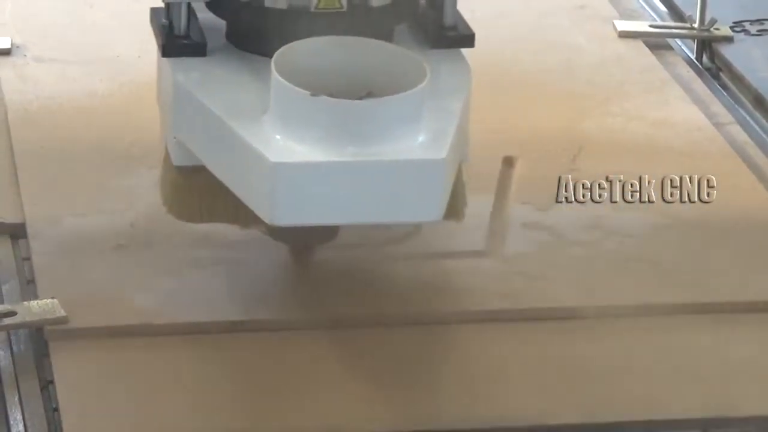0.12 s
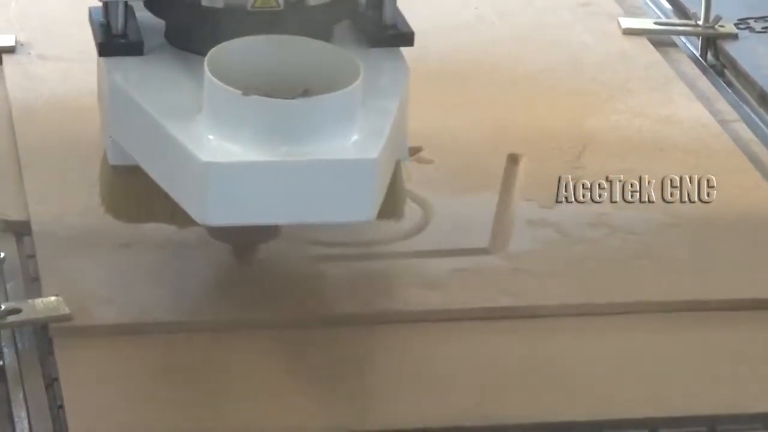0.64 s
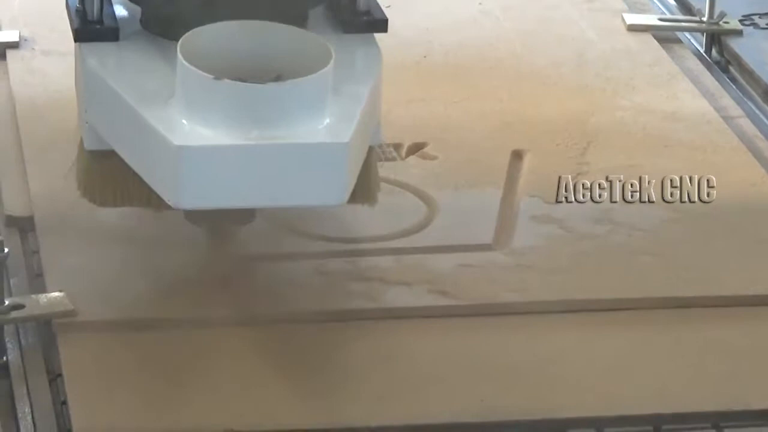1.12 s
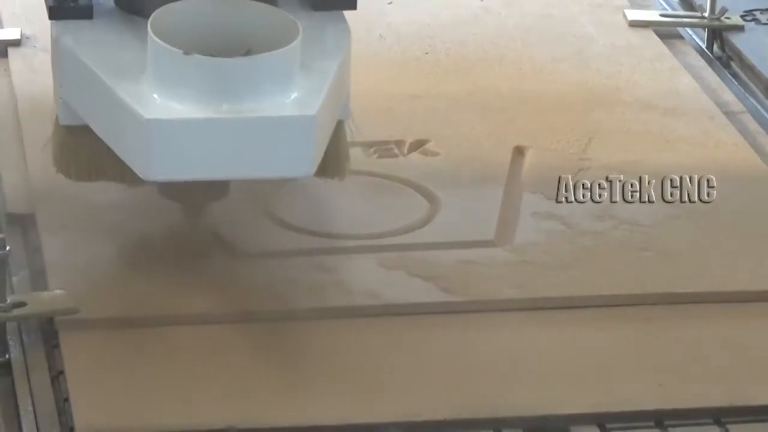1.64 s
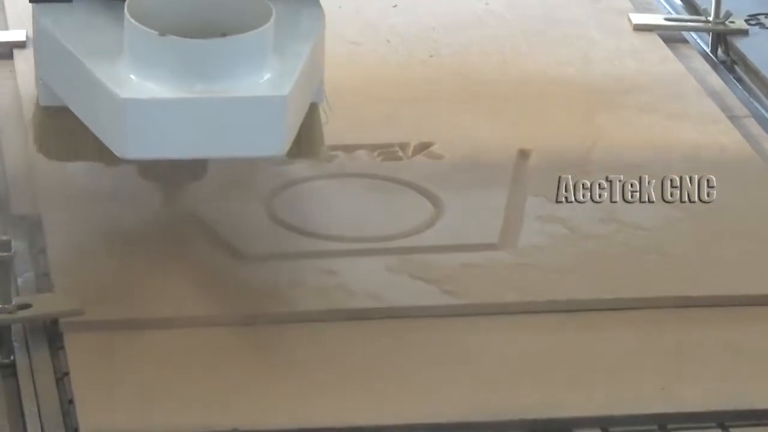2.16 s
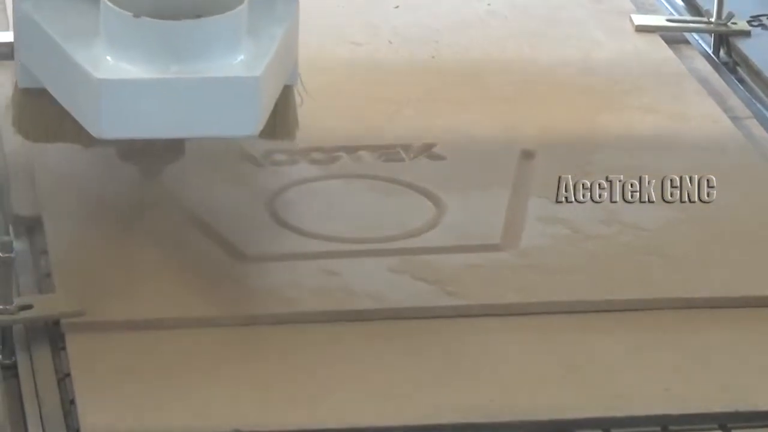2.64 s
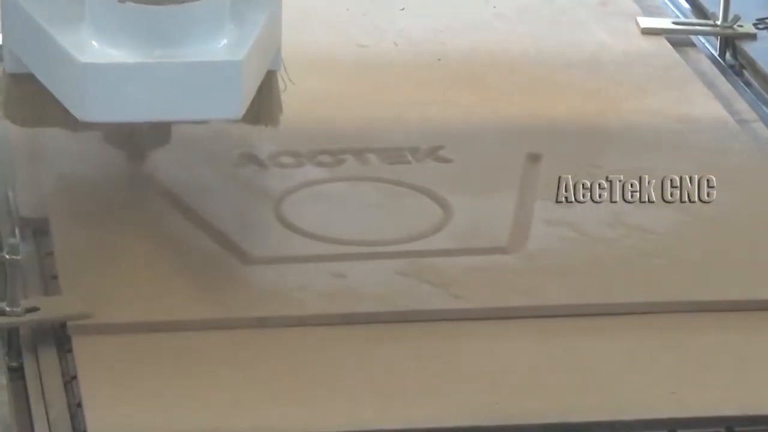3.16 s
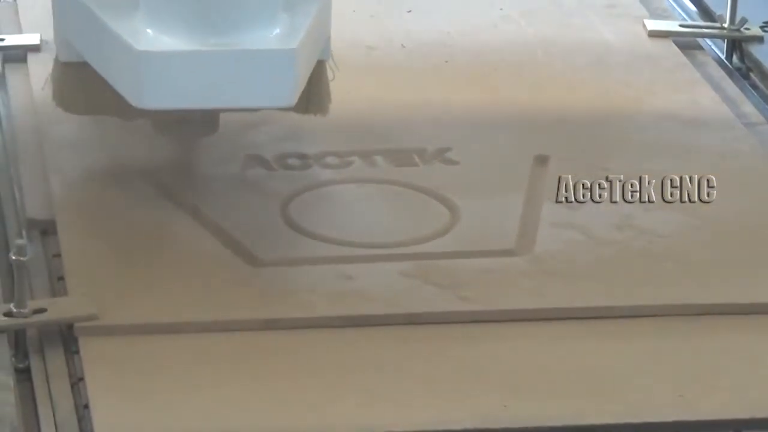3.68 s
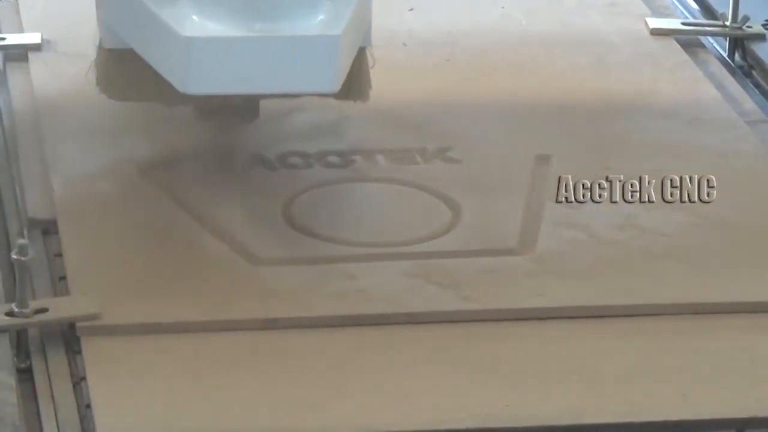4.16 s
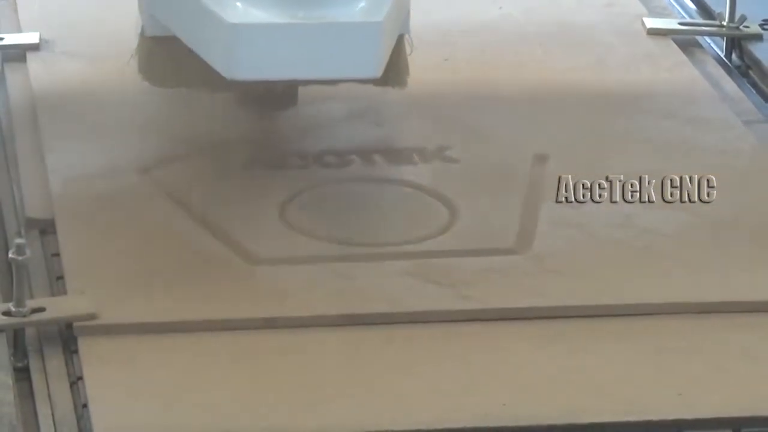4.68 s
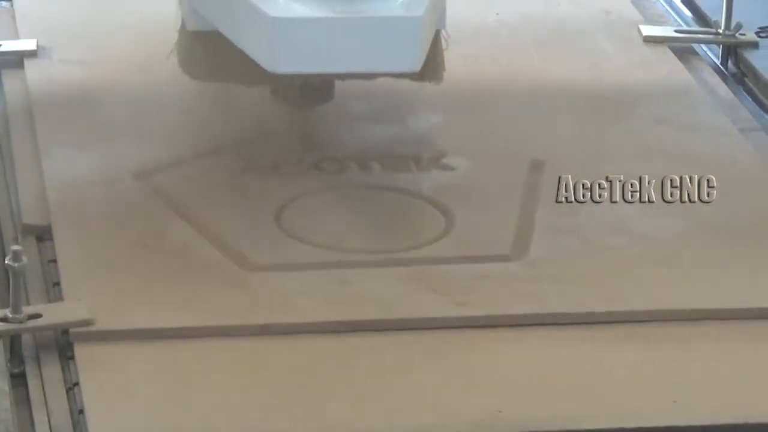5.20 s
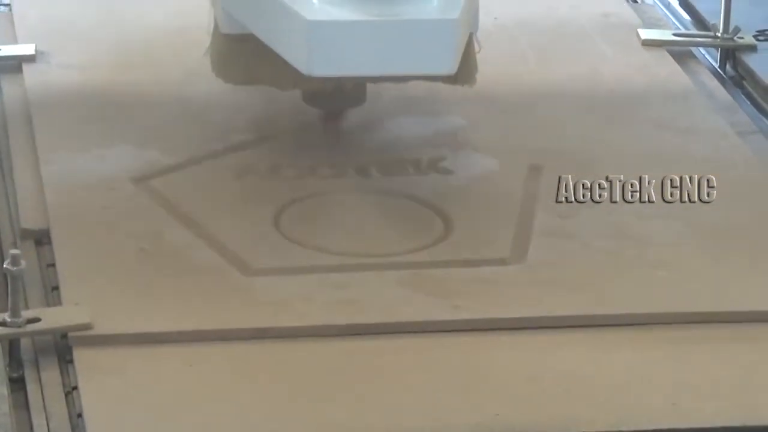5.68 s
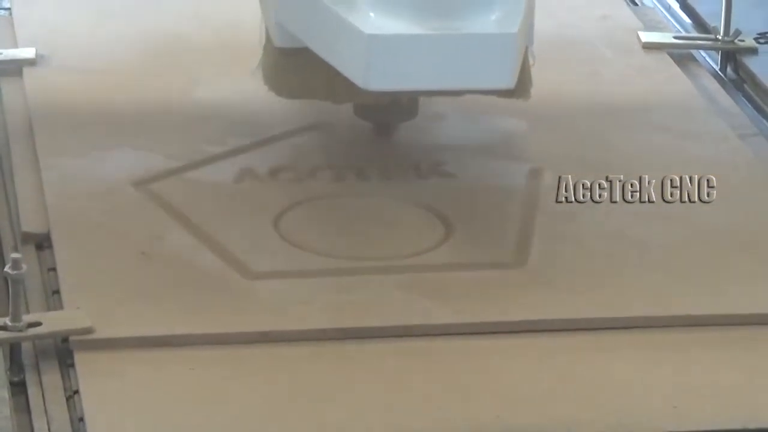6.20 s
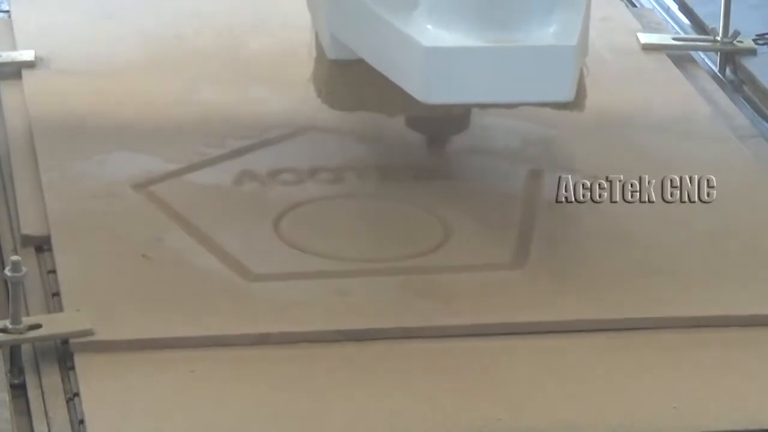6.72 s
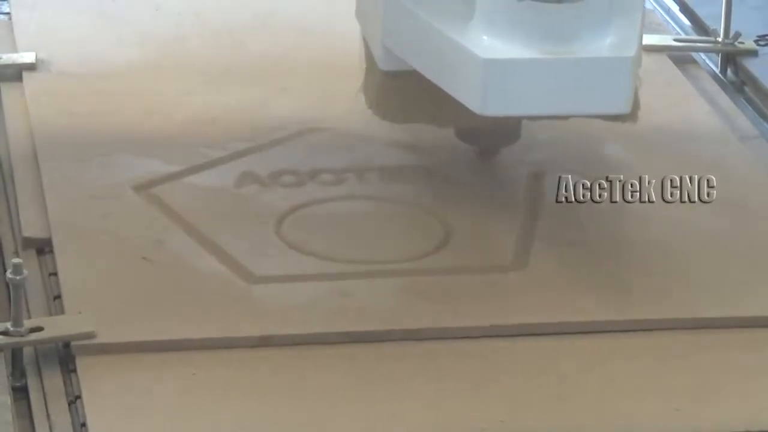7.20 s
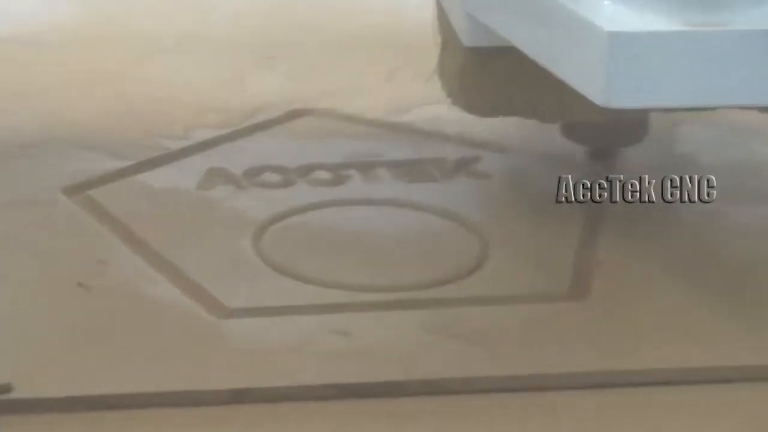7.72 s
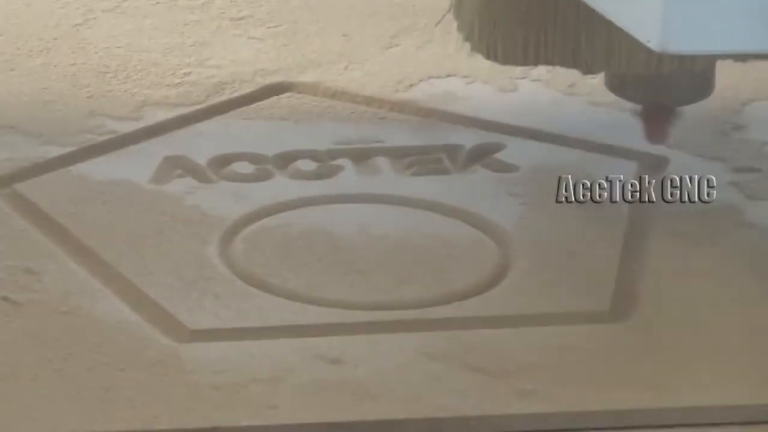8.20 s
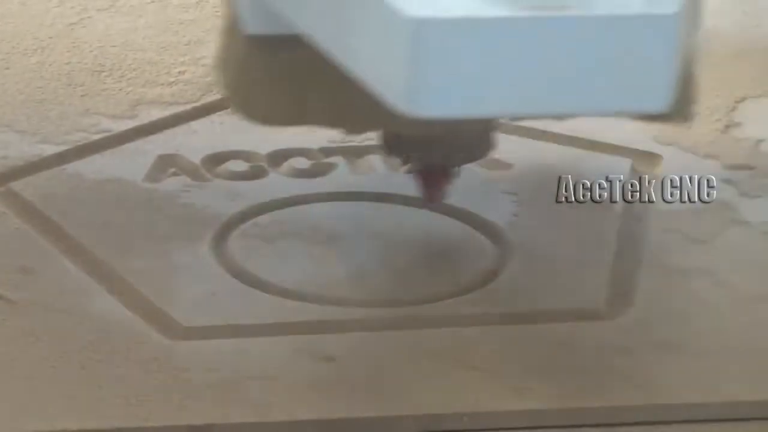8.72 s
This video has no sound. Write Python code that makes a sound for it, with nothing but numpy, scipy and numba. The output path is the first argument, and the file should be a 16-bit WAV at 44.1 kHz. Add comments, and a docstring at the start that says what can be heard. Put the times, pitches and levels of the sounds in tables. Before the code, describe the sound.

A fast spindle sings one unchanging mid-range pitch, with harmonics swelling and fading as the head moves. Over it lies sharp, sizzling chip noise with sliding bright peaks and a short early burst of snaps. Behind are a low fan drone, hum and airy wash. At about eight seconds cutting stops suddenly, leaving air, hum and a fainter whine, heard fairly close in a workshop with slight stereo width.

```python
"""A steady whine stands in front, the spindle of a router at 299.47 turns a second, strongest at twice that.
With it comes the hiss of a bit tearing chips from a wooden board, until it lifts out at 7.9 s.
The whine is a sum of sines; the chips are noise in puffs and ticks timed by the turns, through resonances.
Farther off, coloured noise and three sines make the workshop's fan rumble, drone, rushing air and hum.
Left and right differ by noise patches that flicker in level, strongest near 9 kHz."""
import sys
import numpy as np
from scipy import signal
from scipy.fft import rfft, irfft, next_fast_len
from scipy.io import wavfile
from numba import njit

SR = 44100
rng = np.random.default_rng(int(sys.argv[2]) if len(sys.argv) > 2 else 0)


def materialize(psi):
    """Save the field psi as 16-bit PCM at rate SR to the path in sys.argv[1].

    A 1-D psi becomes a single channel; in a 2-D psi each row is a channel.
    """
    bounded = np.clip(np.atleast_2d(psi).T, -1, 1)
    quanta = np.round(bounded * 32767).astype(np.int16)
    wavfile.write(sys.argv[1], SR, quanta)


N = 390285   # length [samples]

TURNS_PER_S = 299.47
LIFT_S = 7.9   # the bit leaves the wood
SURGE_RISE_S = 0.021   # onset of rumble surges and of splintering


def from_db(db):
    """Decibels to gain."""
    return 10 ** (np.asarray(db) / 20)


def rms_one(x):
    """Scale to rms 1."""
    return x / np.sqrt(np.mean(x ** 2) + 1e-20)


def seconds():
    """Time of every sample."""
    return np.arange(N) / SR


def since_lift():
    """Seconds since the bit left the wood, zero before."""
    return np.maximum(seconds() - LIFT_S, 0)


def in_time(rows):
    """Columns of a timed curve, one value a sample."""
    s, *columns = np.transpose(rows)
    return [np.interp(seconds(), s, column) for column in columns]


def swells(rows):
    """Sum of smooth bumps from (centre [s], length [s], height) rows."""
    hold = 1.29   # above 1 the top of a bump is flat
    total = 0
    for centre, length, height in rows:
        phase = np.pi * np.clip((seconds() - centre) / length, -.5, .5)
        total = total + height * np.minimum(hold * np.cos(phase) ** 2, 1)
    return total


def of_order(rows, k):
    """The bumps whose frequency belongs to order k of the spindle speed."""
    return swells([(s, length, db) for s, length, hz, db in rows if round(hz / TURNS_PER_S) == k])


def colour(x, points):
    """Filter by a (Hz, dB) outline; next to nothing passes outside it."""
    hz, db = np.transpose(points)
    size = next_fast_len(N)
    grid = np.maximum(np.arange(size // 2 + 1) * SR / size, 1)
    gain = from_db(np.interp(np.log(grid), np.log(hz), db, left=-80, right=-80))
    return irfft(rfft(x, size) * gain, size)[..., :N]


def drift(rate):
    """Slow chance: noise at every 40th sample through a double one-pole low-pass at rate [Hz]; spread 1."""
    r = np.exp(-80 * np.pi * rate / SR)
    start = rng.standard_normal(N // 40 + 2002)
    slow = signal.lfilter([1], [1, -2 * r, r * r], start)[2000:]   # settled part only
    return np.interp(np.arange(N) / 40, np.arange(len(slow)), rms_one(slow - slow.mean()))


@njit
def resonance(x, hz, width_hz, sr):
    """Two-pole resonance with a moving centre, gain 1 on top."""
    out, r = np.zeros(len(x)), np.exp(-np.pi * width_hz / sr)
    for i in range(2, len(x)):
        driven = (1 - r * r) / 2 * (x[i] - x[i - 2])
        out[i] = driven + 2 * r * np.cos(2 * np.pi * hz[i] / sr) * out[i - 1] - r * r * out[i - 2]
    return out


def noise(points, patchy_db, rate):
    """Coloured noise whose level flickers a little; rms 1."""
    return rms_one(colour(rng.standard_normal(N), points) * from_db(patchy_db * drift(rate)))


def tone(cycles, waver_db, rate):
    """A sine, of rms 1 but for its waver in level; its phase wavers too."""
    phase = cycles + rng.random() + 0.0054 * drift(rate)
    return np.sqrt(2) * from_db(waver_db * drift(rate)) * np.sin(2 * np.pi * phase)


def leaning(x, left_db):
    """Two channels, the left louder than the right by left_db."""
    return np.array([x * from_db(left_db / 2), x * from_db(-left_db / 2)])


def echoes(x, rows):
    """Short reflections whose wandering lags comb the sound; rows of (lag [ms], wander [ms], level [dB])."""
    now = np.arange(N)
    out = x
    for lag, wander, db in rows:
        delay = (lag + wander * drift(0.39)) * SR / 1000
        out = out + from_db(db) * np.interp(now - delay, now, x)
    return out


def spread(mid, wider_db):
    """Left and right differ by noise patches that flicker in level: the sound smeared by 2 ms of noise."""
    # outline of the side before wider_db, strongest near 9 kHz: (frequency [Hz], level [dB])
    side_outline = [(200, -67), (400, -37), (900, -44), (1500, -44), (3000, -50.5), (6000, -23.5),
                    (8800, -17.5), (11000, -27), (15000, -54)]
    size = round(.002 * SR)
    smears = rng.standard_normal((8, size)) * from_db(-30 * np.arange(size) / size)
    patches = sum(drift(13.0) * np.convolve(mid, smear)[:N] for smear in smears)
    patches = patches / np.sqrt(np.sum(smears ** 2))
    side = from_db(wider_db + 2.0 * drift(9.0)) * colour(patches, side_outline)
    return np.array([mid + side, mid - side])


def surges():
    """Gain of the rumble in dB: quick rise, straight fall."""
    # the rumble surges and dies away: (time [s], level above the rumble [dB], decay [dB per s])
    surge_rows = [(0.798, 6, 12), (3.56, 11, 21), (3.74, 5.5, 6), (5.4, 4, 1.5), (7.97, 7, 5),
                  (8.55, 3.5, 2)]
    total = 0
    for s, db, fall in surge_rows:
        age = seconds() - s
        rise = np.clip(age / SURGE_RISE_S, 0, 1)
        total = total + np.maximum(db * rise - fall * np.maximum(age, 0), 0)
    return total


def rumble(deep_db, rumble_db):
    """Fan rumble as low noise, a little left and unlike in the two channels; surges are equal in both."""
    # noise outlines, the last for what differs between the channels: (frequency [Hz], level per Hz [dB])
    deep_outline = [(15, -40), (30, -16), (50, 3), (62, -9), (75, 4), (90, -10), (120, -27)]
    rumble_outline = [(60, -34), (90, -13.5), (150, -1), (230, -0.5), (290, 2.5), (400, -44)]
    side_outline = [(60, -20), (100, -3), (160, 4), (260, -14), (350, -40)]
    deep, deep_side = [from_db(deep_db) * noise(deep_outline, patchy_db=2.5, rate=3.0) for _ in range(2)]
    mid, mid_side = [from_db(rumble_db) * noise(outline, patchy_db=2.2, rate=10.0)
                     for outline in (rumble_outline, side_outline)]
    surging = mid * (from_db(surges()) - 1)   # only what exceeds the steady rumble
    side = from_db(-14) * (deep_side + mid_side) * [[1], [-1]]
    return surging + leaning(deep, left_db=4) + leaning(mid, left_db=1.3) + side


def hum(first_db, fourth_db):
    """Blade-pass tone of 500.7 Hz with its second and fourth multiples."""
    cycles = 500.7 * seconds()
    first = tone(cycles, waver_db=2.5, rate=30.0)
    second = from_db(-11.5) * tone(2 * cycles, waver_db=2.5, rate=6.7)
    fourth = tone(4 * cycles, waver_db=1.3, rate=12.0)
    return from_db(first_db) * (first + second) + from_db(fourth_db) * fourth


def duct_drone():
    """Fan drone: low noise beside noise ringing in a duct resonance whose level flutters."""
    # (frequency [Hz], level per Hz [dB])
    drone_outline = [(220, -27), (300, -4.5), (420, -4), (560, -7), (750, -13.5), (1100, -42)]
    # swells of the duct: (centre [s], length [s], height [dB])
    duct_swells = [(1.3, 0.55, 5.5), (2.4, 0.62, 5.5), (3.25, 0.66, 6.5), (4.2, 0.5, 1), (7.2, 1.0, -5)]
    duct_hz, duct_width_hz, duct_db = 369, 23, -1
    duct = resonance(rng.standard_normal(N), np.full(N, float(duct_hz)), duct_width_hz, SR)
    duct = rms_one(duct * from_db(0.8 * drift(5.4)))
    return noise(drone_outline, patchy_db=1.0, rate=4.6) + from_db(duct_db + swells(duct_swells)) * duct


def moving_air(rush_db, air_db):
    """Air as flickering noise: a rush combed by nearby walls, a hiss that thins at the lift, and a bright jet."""
    # noise outlines of rush, hiss and cooling air: (frequency [Hz], level per Hz [dB])
    rush_outline = [(500, -5.5), (750, -1.5), (1300, -3), (2000, -4), (2400, -5), (3000, -33)]
    air_outline = [(2000, -42), (2500, 4), (3500, 7.5), (4600, 5), (6000, -4), (9000, -8)]
    jet_outline = [(3240, -52), (5500, -14.5), (7580, -5), (8310, -4.5), (8990, -1.5), (10000, -3.5),
                   (13400, -9), (15700, -12.5)]
    # reflections off nearby walls: (lag [ms], wander [ms], level [dB])
    wall_echoes = [(3.7, .25, -5), (6.1, .4, -6), (9.3, .5, -7)]
    # swells of the hiss: (centre [s], length [s], height [dB])
    air_swells = [(.4, 1.1, -0.5), (2.5, 0.85, 1.5), (4.1, 0.56, -3.5), (5.85, 0.6, 3), (6.3, 1.1, -1.5),
                  (7.3, 1.1, 0)]
    rush = rms_one(echoes(noise(rush_outline, patchy_db=1.23, rate=34.0), wall_echoes))
    air_db = air_db + swells(air_swells) - 5 * np.minimum(20 * since_lift(), 1)
    hiss = noise(air_outline, patchy_db=1.34, rate=26.0)
    jet_db = -33.5 + 4 * since_lift()   # grows by 4 dB per s after the lift
    jet = from_db(jet_db) * noise(jet_outline, patchy_db=0.64, rate=12.0)
    return from_db(rush_db) * rush + from_db(air_db) * hiss + jet


def workshop(shop_db):
    """The room behind the router: each layer follows its own share of the common swing in level."""
    # deep, rumble, drone, rush, air, hum, fourth multiple of the hum: (level [dB], share of the swing)
    layers = [(-64, 0.84), (-48.5, 0.76), (-40, 0.58), (-37, 0.5), (-39, 0.46), (-44.5, 0.07),
              (-50.5, 0.23)]
    # hum and its fourth multiple: (centre [s], length [s], height [dB])
    hum_swells = [(.95, .6, 3), (2.1, 1, -17), (3.8, 1.3, -4), (4.85, 0.66, 0), (5.8, 0.67, 4),
                  (8.4, 3.4, 6.5)]
    fourth_swells = [(1.1, 1.0, 3), (3.4, 1.1, 2.5), (5.8, 2.5, -4), (8.3, 2.8, 6)]
    levels = [db + share * shop_db for db, share in layers]
    deep_db, rumble_db, drone_db, rush_db, air_db, hum_db, fourth_db = levels
    tones = hum(hum_db + swells(hum_swells), fourth_db + swells(fourth_swells))
    mid = from_db(drone_db) * duct_drone() + moving_air(rush_db, air_db) + tones
    return rumble(deep_db, rumble_db) + spread(mid, wider_db=7.5)   # farther off than the bit


def splinters():
    """The bit splinters the board: dense uneven snaps that set in quickly and thin out."""
    # bursts as the bit changes course: (time [s], level [dB], decay [dB per s])
    bursts = [(.79, -31, 120), (.86, -35.5, 30), (.96, -38, 90), (1.04, -40, 20), (1.17, -42, 60),
              (2.3, -47, 20), (5.8, -40, 32)]
    # (frequency [Hz], level per Hz [dB])
    snap_outline = [(300, -22), (600, 2), (1200, -3), (2500, -5.5), (3800, -14), (5000, -32)]
    snaps_per_s = 700 * from_db(6.0 * drift(25.0))
    heights = from_db(3.1 * np.minimum(rng.exponential(1, N), 5)) * rng.choice([-1, 1], N)
    snaps = (rng.random(N) < snaps_per_s / SR) * heights
    gain = 0
    for s, db, fall in bursts:
        age = seconds() - s
        gain = gain + np.clip(age / SURGE_RISE_S, 0, 1) * from_db(db - fall * np.maximum(age, 0))
    return gain * rms_one(colour(snaps, snap_outline))


def flares(tearing):
    """Peaks flare and slide as the head travels: resonances on three streams of tearing noise, faded in and out."""
    # (centre [s], length [s], frequency [Hz], glide [Hz per s], level [dB])
    flare_rows = [(0.56, 1.7, 9600, 0, 2), (0.73, 2.1, 8700, 256, -3), (1.27, 0.88, 10500, 0, -3),
                  (1.1, .8, 7500, -200, -10), (1.86, 1.8, 7960, 1500, 0.5), (2.25, 0.98, 10800, 2200, -3),
                  (2.46, 1, 7100, 500, 1.5), (1.3, 0.86, 8900, 0, -4.5), (1.77, 1.1, 9500, 400, -5),
                  (5.1, 0.39, 8600, 0, -1.5), (5.15, 0.38, 10000, 0, -3.5), (4.9, .5, 12300, -4, -6),
                  (.7, 1.0, 12600, -1, -5), (2.6, 0.83, 8400, 1200, -4), (3.38, 2, 7380, -700, 3),
                  (2.86, 6.9, 5700, 105, -5), (3.55, 0.83, 6700, -800, 0), (4.22, 1.2, 8400, 502, 0),
                  (2.74, .8, 5300, 0, -10), (3.57, 0.94, 10000, 0, -3), (4.4, 1.2, 7200, 300, 2.5),
                  (5.2, 1.1, 7250, 500, 1), (5.7, 0.47, 7060, 3, 2.5), (5.6, 0.26, 9100, -5, 2.5),
                  (5.6, 0.47, 10100, -3, -1), (7.7, 0.49, 7000, 0, 1.5), (6.4, 0.51, 9600, -3, 4.5),
                  (6.7, 1.9, 7900, -100, -0.5), (7.15, 0.51, 9200, 2, 0.5), (6.45, 0.54, 8950, 0, 0.5),
                  (6.45, 0.46, 10300, 0, -2.5), (6.45, .45, 7100, 0, 1.5), (7.25, .6, 5400, 0, -5),
                  (2.6, 2.4, 5300, 50, -10), (7.55, 0.54, 6700, 0, 7), (7.55, 0.84, 8000, 0, 1.5),
                  (8.5, 0.3, 10200, 0, -2), (8.7, 0.43, 10100, 5, -10), (7.6, 0.6, 6100, 5, 2),
                  (7.86, 0.082, 7000, 0, -9), (7.86, 0.11, 7160, 0, 12), (7.86, 0.15, 8060, 0, 7),
                  (7.8, 0.058, 10200, 0, 3)]
    width_hz = 440   # of each of two passes
    out, sources = np.zeros(N), [tearing() for _ in range(3)]
    for k, (s, length, hz, glide, db) in enumerate(flare_rows):
        first = max(int((s - length / 2) * SR), 0)
        last = min(int((s + length / 2) * SR), N)
        offset = np.arange(first, last) / SR - s
        centre = hz + glide * offset
        once = resonance(sources[k % 3][first:last], centre, width_hz, SR)
        peak = resonance(once, centre, width_hz, SR)
        out[first:last] += from_db(db) * rms_one(peak) * np.cos(np.pi * offset / length)
    return out


def cutting(turns, chips_db, dull_db, bright_db):
    """Fibres tear in a puff every turn, with a weaker puff from the second flute; a tick repeats each turn."""
    # the head slows and ticks clear: (centre [s], length [s], added share of ticks)
    corners = [(2.2, 1.0, .04), (3.25, .6, .12), (5.53, .4, .2)]
    # standing peaks in the hiss: (frequency [Hz], level [dB])
    ring_rows = [(7050, -2), (8500, -1), (9600, -7), (10400, -6)]
    # noise outlines: (frequency [Hz], level [dB])
    chip_outline = [(5600, -32), (6500, 4), (7500, 7), (9000, 4.5), (10500, 2), (11500, -16)]
    dull_outline = [(4400, -11), (5000, -7.5), (5300, -2.5), (6000, 1.5), (6600, 2), (7200, -26)]
    bright_outline = [(10200, -16), (11200, 5), (13000, 2.5), (15500, -1), (17000, -26.5)]
    # the dust shoe lets only the treble out: (frequency [Hz], level [dB])
    shoe_outline = [(3500, -22), (5000, 4.5), (5600, -1.5), (10800, 2), (13000, 0), (14000, -15)]
    # reflections off board and frame: (lag [ms], wander [ms], level [dB])
    board_echoes = [(.9, 0.027, -20), (1.7, 0.068, -13.5), (2.9, 0.122, -14)]
    leaving = seconds() > LIFT_S - .08
    tick_share = np.where(leaving, .85, .06 + swells(corners))
    angle = 2 * np.pi * turns
    flutes_db = 3.6 * np.cos(angle - .6) + 2.0 * np.cos(2 * angle - 1.2)
    puffs = rms_one(from_db(flutes_db + 0.5 * drift(48.0) + 0.58 * drift(5.7)))
    ticks = np.diff(np.floor(turns + 0.0047 * drift(80.0)), prepend=0) * from_db(0.57 * drift(70.0))

    def tearing():
        """Fresh noise under the shared puffs; the edge drags each tick out over half a millisecond."""
        scrape = rng.standard_normal(60) * from_db(-.8 * np.arange(60))
        scraped = rms_one(np.convolve(ticks, scrape)[:N])
        return np.sqrt(1 - tick_share) * puffs * rng.standard_normal(N) + np.sqrt(tick_share) * scraped

    broad = rms_one(colour(tearing(), chip_outline))
    peaks = flares(tearing)
    for hz, db in ring_rows:
        ring = rms_one(resonance(tearing(), hz + 150 * drift(1.5), 380, SR))   # wander and width in Hz
        peaks = peaks + from_db(db + 1.0 * drift(0.61)) * ring
    peaks = rms_one(colour(peaks, shoe_outline))
    dull = from_db(dull_db) * rms_one(colour(tearing(), dull_outline))
    bright = from_db(bright_db + 0.82 * drift(5.3)) * rms_one(colour(tearing(), bright_outline))
    hiss = from_db(-3) * broad + from_db(-1) * peaks + dull + bright
    return from_db(chips_db) * echoes(hiss, board_echoes)


def whine(turns, chips_db, shop_db):
    """Sines at the orders of the spindle speed; the second, two flutes a turn, leads."""
    # the flutes' bite, heard as the second order: (time [s], level [dB])
    bite = [(0.0, -21), (0.83, -26), (0.89, -32.5), (0.96, -34), (1.03, -25.5), (1.17, -27.5), (1.24, -30),
            (1.29, -33), (1.46, -36.5), (1.6, -34), (1.92, -32.5), (2.69, -22), (3.2, -24.5), (4.95, -20),
            (5.49, -25.5), (5.54, -30.5), (5.82, -21.5), (6.11, -25.5), (7.22, -21.5), (7.56, -23.5),
            (7.86, -32), (7.94, -40), (8.13, -45), (8.18, -37), (8.43, -34), (8.48, -42), (8.6, -39),
            (8.68, -33), (8.85, -37)]
    # the other low orders: (order, level before swells [dB], share of the workshop's swing, loss at the lift [dB])
    low_orders = [(1, -43.5, 1, 0.5), (3, -46.5, 0.28, 5), (4, -46, 0.14, 23), (5, -47, 0.088, 16),
                  (6, -50.5, .2, 8), (7, -53.5, .2, 11)]
    # upper orders, heard while the bit cuts: (order, level re chips before swells [dB])
    upper_orders = [(8, -32), (9, -32.5), (10, -32), (11, -29.5), (12, -33), (13, -32)]
    # orders swell and fade as the head moves over the board: (centre [s], length [s], frequency [Hz], height [dB])
    order_swells = [(.4, 0.65, 299, 2.5), (1.3, 1.2, 299, 5.5), (2.75, 1.3, 299, -13), (3.4, 1, 299, 5),
                    (5.1, 1.2, 299, -9), (6.3, 1.07, 299, -11), (7.597, 0.43, 299, 1.5),
                    (7.94, 0.15, 299, 10), (.15, 0.87, 898, 5.5), (1.097, 0.64, 898, 3.5),
                    (1.9, 1.9, 898, 8.5), (2.8, 1.63, 898, 11), (3.8, 1.1, 898, -6), (4.7, 1.5, 898, 3.5),
                    (6.7, 2.8, 898, 5), (0.403, 2.1, 1198, 9), (1.16, .25, 1198, 5), (2.5, 1.0, 1198, 5.5),
                    (3.747, 0.34, 1198, 6.5), (4.602, 1.9, 1198, 7), (5.523, 0.18, 1198, 7),
                    (5.7, 0.16, 1198, -4), (6.75, 0.23, 1198, 1.5), (6.8, 2.1, 1198, 7),
                    (7.67, 0.16, 1198, 13), (0.755, 1.1, 1497, 4.5), (1.283, 0.32, 1497, 7.5),
                    (2.198, 1.76, 1497, 9), (4.3, 0.24, 1497, 6), (4.7, .3, 1497, -12), (6.2, 1.6, 1497, 6),
                    (7.4, 1.6, 1497, 9), (.95, 0.81, 1797, 6), (2.8, 1.7, 1797, 6), (5.2, 2.2, 1797, 1.5),
                    (7.3, 1.5, 1797, 5.5), (1.25, 1.2, 2096, 8), (2.4, 1.1, 2096, 1), (5.8, 0.78, 2096, 6),
                    (7.4, 1.1, 2096, 5), (.9, 0.45, 2396, 13), (2.35, .5, 2396, 8), (.9, .3, 2695, 13),
                    (2.42, .45, 2695, 12), (2.15, 0.58, 3594, 14), (4.1, .5, 3594, -8)]
    # orders lean to a side as the head moves: (centre [s], length [s], frequency [Hz], left minus right [dB])
    order_leans = [(0.34, 1.7, 299, 11), (2.36, 2.2, 299, 7), (1.8, 1.9, 599, 1), (2.58, 5, 599, 1.7),
                   (8.7, 0.75, 599, 3), (0.17, 0.97, 898, 3), (1.9, 3.5, 898, 3), (4.7, 2.3, 898, 4),
                   (1.74, 1.1, 1198, 3), (0.72, 0.61, 1797, 6), (7.2, 0.75, 1797, 3)]
    second = from_db(in_time(bite)[0]) * tone(2 * turns, waver_db=0.84, rate=28.0)
    out = leaning(second, of_order(order_leans, 2))
    for k, db, share, lost_db in low_orders:
        level_db = db + share * shop_db + of_order(order_swells, k) - lost_db * np.minimum(20 * since_lift(), 1)
        order = from_db(level_db) * tone(k * turns, waver_db=1.9, rate=13.0)
        out = out + leaning(order, of_order(order_leans, k))
    upper = 0
    for k, db in upper_orders:
        upper = upper + from_db(db + of_order(order_swells, k)) * tone(k * turns, waver_db=3.5, rate=6.4)
    return out + from_db(chips_db) * upper


def scene():
    """Workshop, cut and spindle together."""
    # how loud the workshop comes through: (time [s], swing [dB], of which each layer takes a share)
    shop = [(0, 8), (.3, 3.5), (.78, 5.5), (.86, 6.5), (1.5, 5), (1.95, 5.5), (2.55, 5.5), (3.0, 2.5),
            (4.1, -0.5), (5.1, -0.5), (5.9, -3), (6.1, -5.5), (7.3, -1.5), (7.9, -1), (8.05, 0.5), (8.5, 4),
            (8.85, 9.5)]
    # the cut; the dull edge tells how far the dust shoe gapes toward the listener:
    # (time [s], chips [dB], dull edge re chips [dB])
    cut_rows = [(0, -25.5, -8), (.2, -29, -10.5), (.5, -26.5, -16), (.85, -28, -13), (1.15, -25, -10.5),
                (2.1, -26.5, -7), (2.6, -25.5, -6.5), (3.8, -27, -6), (4.4, -28, -8), (5.0, -25, -15.5),
                (5.6, -25.5, -14), (5.85, -24.5, -12), (6.45, -25.5, -10), (6.8, -27, -5), (7.5, -27, -7.5),
                (7.7, -29.5, 0), (7.79, -31.5, -8), (7.93, -37, -14)]
    # bright edge: (centre [s], length [s], height [dB])
    bright_swells = [(.85, 0.55, 2), (3.2, 0.66, 1), (4.9, .5, 2), (5.9, 0.36, 4), (6.22, .2, 0),
                     (3.8, 0.99, -1)]
    turns = TURNS_PER_S * seconds()
    shop_db, = in_time(shop)
    chips_db, dull_db = in_time(cut_rows)
    chips_db = chips_db - 400 * since_lift()   # the bit leaves the wood
    bright_db = -8.5 + 0.42 * shop_db + swells(bright_swells)   # re chips
    chips = cutting(turns, chips_db, dull_db, bright_db) + splinters()
    return workshop(shop_db) + spread(chips, wider_db=-7) + whine(turns, chips_db, shop_db)


def roll_off(x):
    """The treble ends steeply here."""
    return signal.sosfilt(signal.butter(12, 16740, fs=SR, output="sos"), x)


def record(dry):
    """The microphone rounds the peaks and loses the deep bass; the top is cut steeply."""
    headroom = .6   # peaks round off toward this height
    bass_cut = signal.butter(2, 37, "high", fs=SR, output="sos")
    top_cut = signal.ellip(12, .3, 70, 15730, fs=SR, output="sos")
    rounded = headroom * np.tanh(dry / headroom)
    led_in = np.pad(rounded, ((0, 0), (4000, 0)), "reflect")   # lets the filters settle
    mix = signal.sosfilt(np.vstack([bass_cut, top_cut]), led_in)[:, -N:]
    return roll_off(mix)


dry = scene()
out = record(dry)
materialize(out)
```